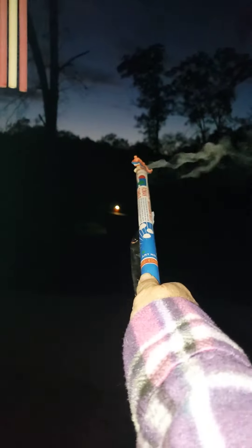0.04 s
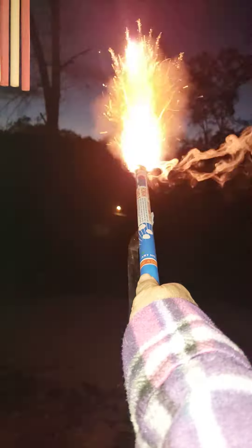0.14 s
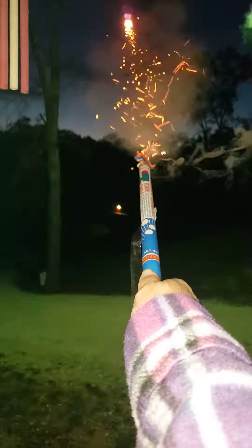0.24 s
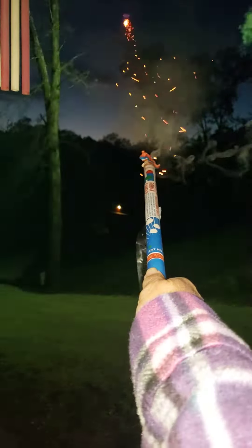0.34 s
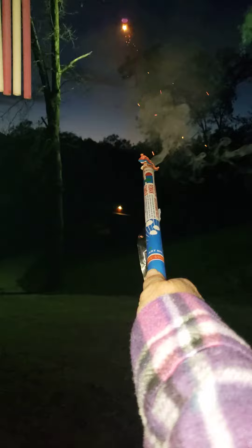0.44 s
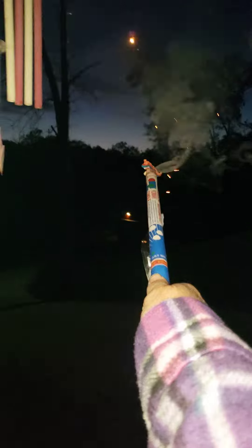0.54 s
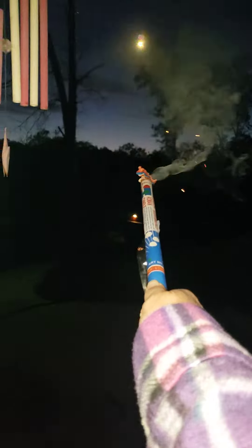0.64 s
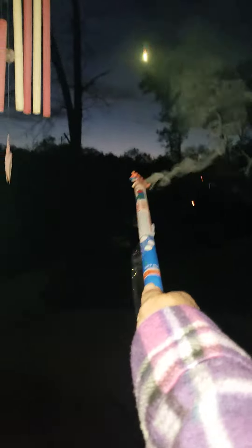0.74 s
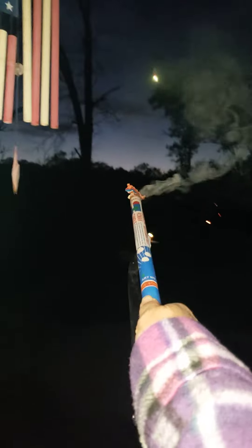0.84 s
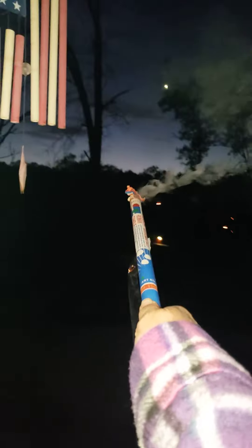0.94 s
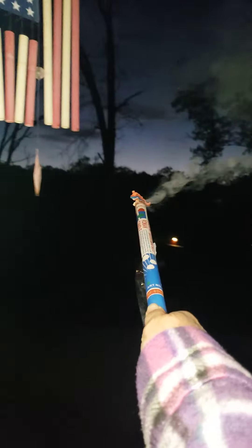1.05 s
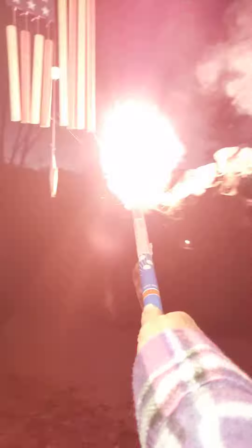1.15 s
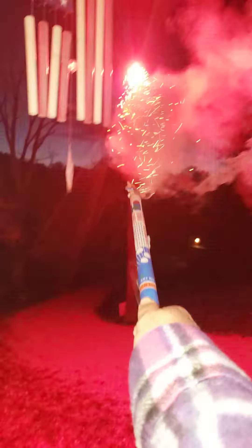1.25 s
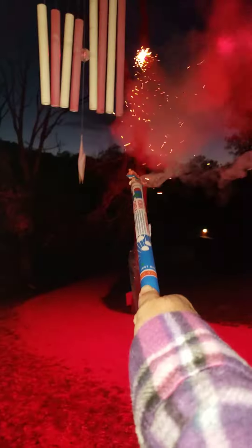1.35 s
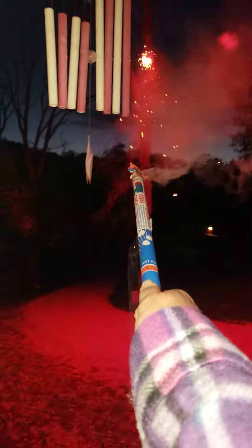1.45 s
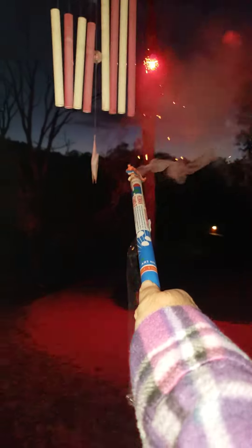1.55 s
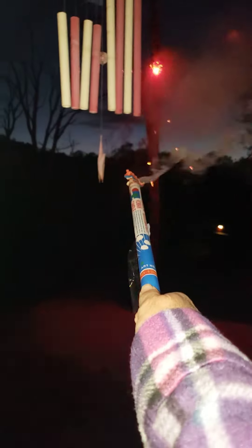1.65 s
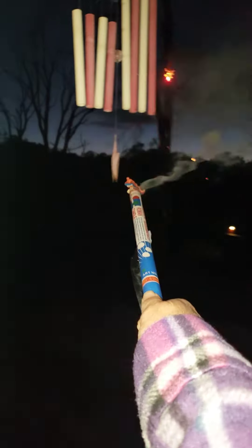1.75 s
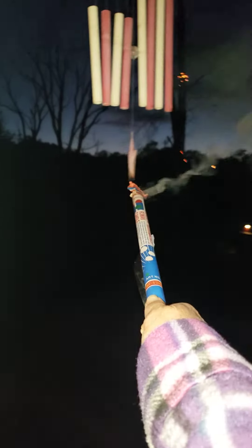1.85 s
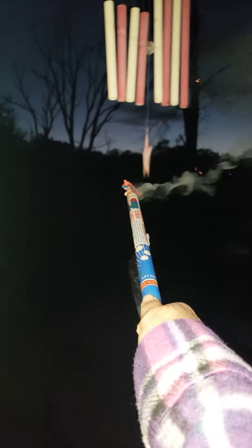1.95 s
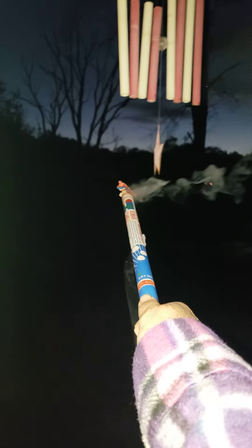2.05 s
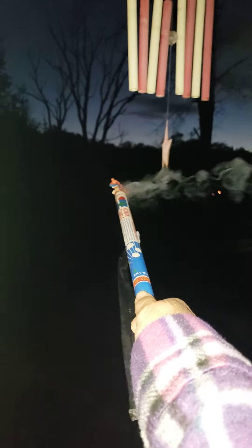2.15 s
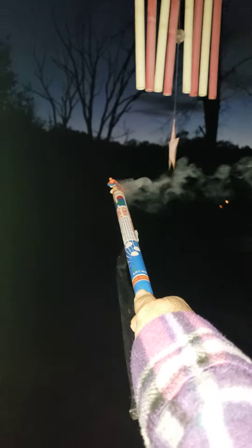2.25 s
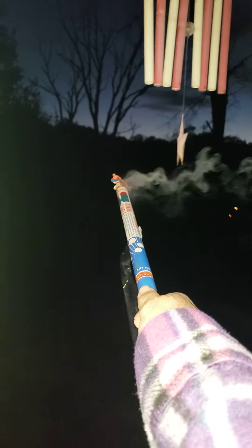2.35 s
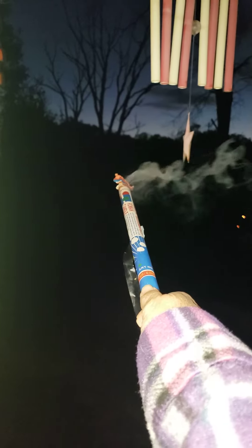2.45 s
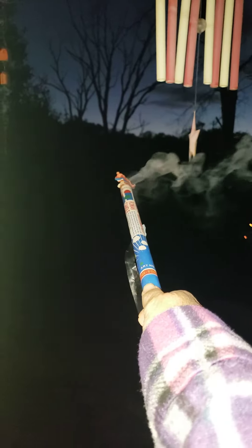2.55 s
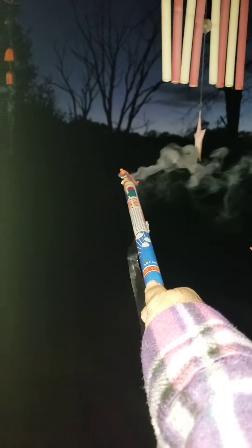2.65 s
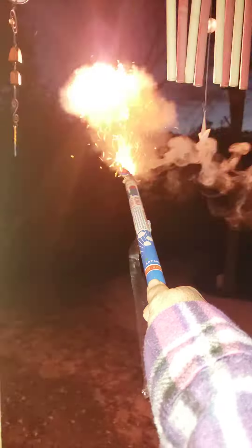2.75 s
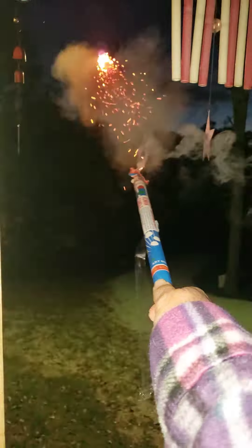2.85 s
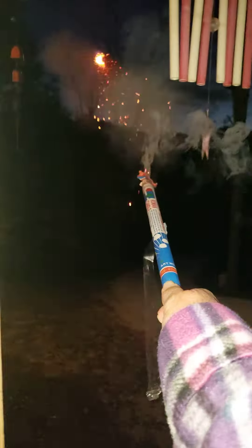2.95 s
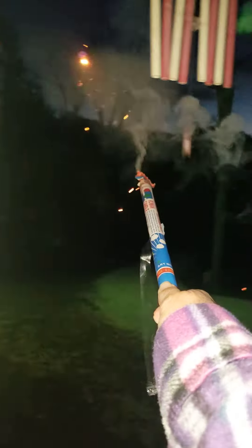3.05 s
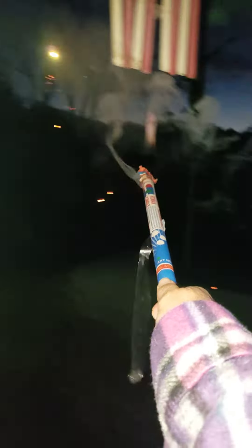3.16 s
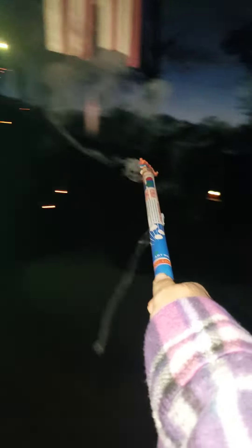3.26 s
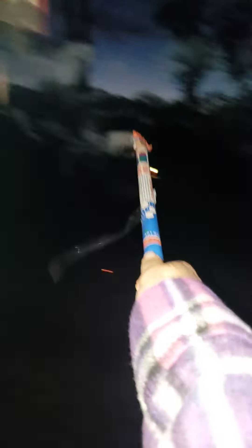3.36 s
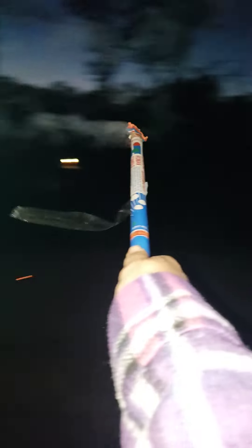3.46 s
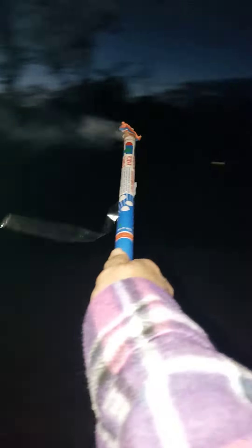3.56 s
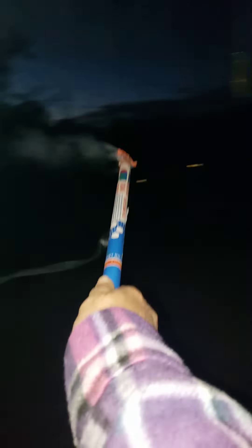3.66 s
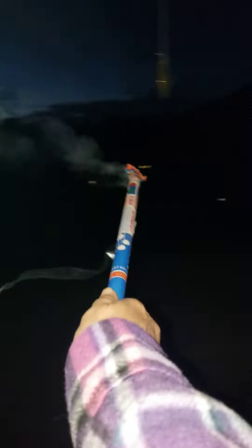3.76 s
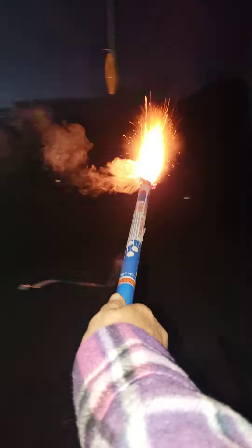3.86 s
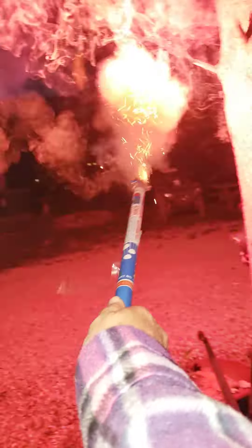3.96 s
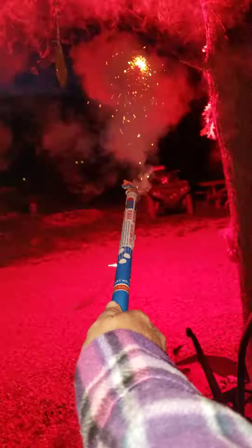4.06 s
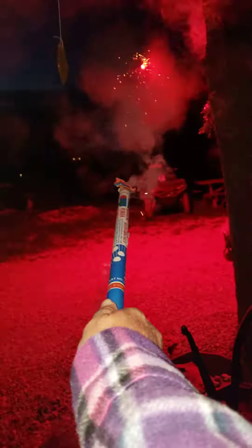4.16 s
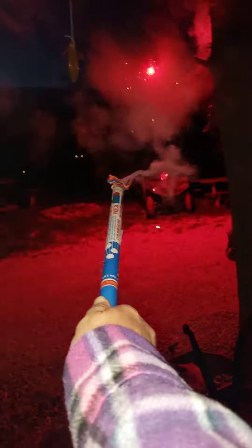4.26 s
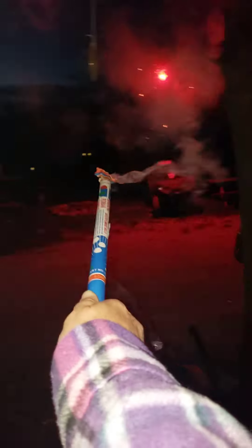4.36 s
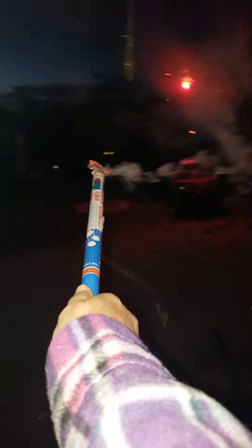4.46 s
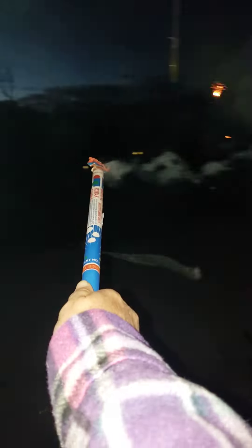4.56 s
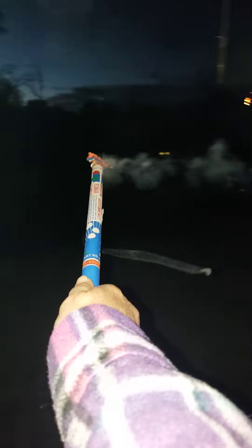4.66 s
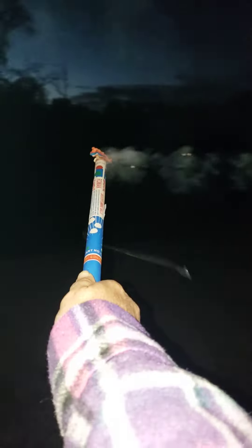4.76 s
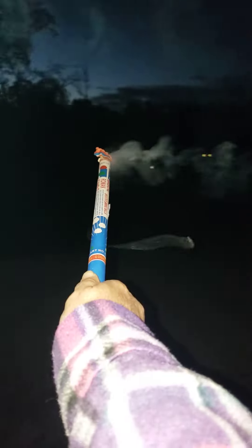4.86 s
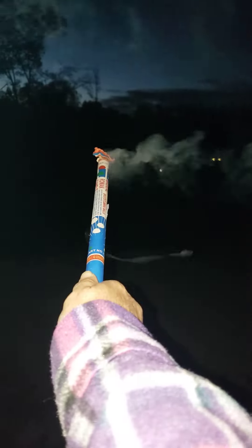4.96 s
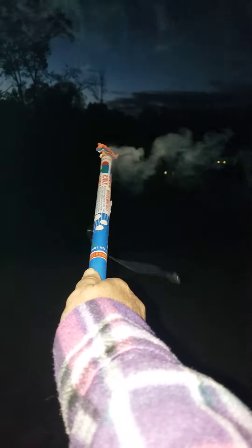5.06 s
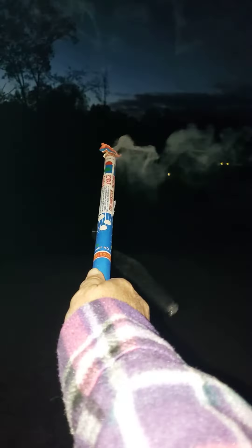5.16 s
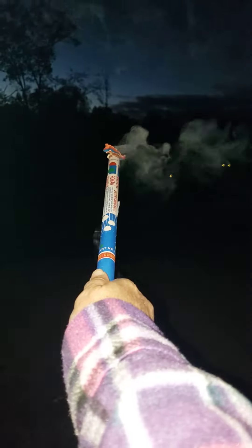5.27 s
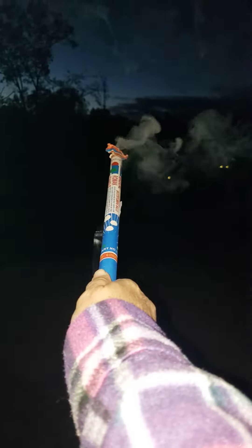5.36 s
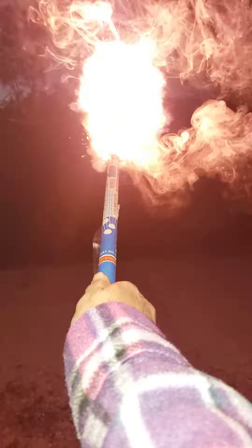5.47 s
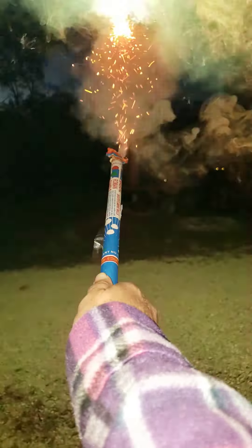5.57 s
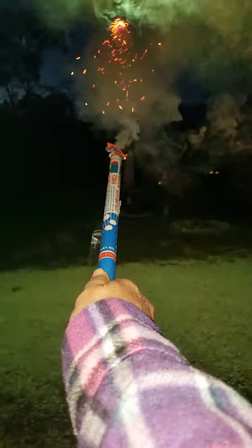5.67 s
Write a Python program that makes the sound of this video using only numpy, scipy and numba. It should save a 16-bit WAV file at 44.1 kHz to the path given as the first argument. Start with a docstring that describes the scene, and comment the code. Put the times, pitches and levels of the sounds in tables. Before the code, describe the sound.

A handheld firework tube burns close to the microphone, outdoors beside a porch on a quiet night. Its fuse fizzes softly with a slightly hollow tone. Five times, a little over a second apart, it shoots a fireball with a sharp pop and a short crackling rush of gas, each followed by a brief echo. The hiss continues between the shots, with a few tiny spark snaps.

```python
"""Beside a porch at dusk, a hand-held firework tube burns. Fuse powder hisses deep in the cardboard tube,
a pipe closed at one end, whose odd modes fall in pitch as the burn lengthens the air column. Five times
a lift charge blows a star out in a crackling rush of turbulent gas, with shock fronts and a low push
of air. Porch, ground and trees reflect the shots. Sparks snap, and a far thud and a faint tone sound
over the quiet night. Two microphones a few centimetres apart listen."""
import sys
import numpy as np
from scipy import signal
from scipy.fft import rfft, irfft
from scipy.io import wavfile
from numba import njit

SR = 44100
rng = np.random.default_rng(int(sys.argv[2]) if len(sys.argv) > 2 else 0)


def int16_out(signal):
    """Quantize to a 16-bit WAV file."""
    q = np.round(np.clip(np.atleast_2d(signal).T, -1, 1) * 32767)
    wavfile.write(sys.argv[1], SR, q.astype(np.int16))


N = 252711
T = np.arange(N) / SR
HZ = np.maximum(np.fft.rfftfreq(N, 1 / SR), 1)


def amp(db):
    """Amplitude ratio of a level in decibels."""
    return 10 ** (np.asarray(db) / 20)


def unit(x):
    """Normalisation to rms 1."""
    return x / np.sqrt(np.mean(x ** 2) + 1e-20)


def at_hz(points, hz=HZ):
    """Interpolation of a table on a log-frequency axis."""
    return np.interp(np.log(hz), np.log(np.array(points)[:, 0]), np.array(points)[:, 1])


def coloured(x, spectrum):
    """Spectral shaping of x, to rms 1."""
    return unit(irfft(rfft(x) * amp(at_hz(spectrum)), N))


def butter(x, hz, kind, order=2):
    """Butterworth filter."""
    return signal.sosfilt(signal.butter(order, hz, kind, fs=SR, output="sos"), x)


def drift(hz):
    """Random modulation: low-pass noise of rms 1."""
    return unit(irfft(rfft(rng.standard_normal(N)) / (1 + (HZ / hz) ** 2), N))


def bump(middle_s, half_s, level_db):
    """A Gaussian envelope in time."""
    return amp(level_db) * np.exp(-((T - middle_s) / half_s) ** 2)


def crackle(per_s, spread_db, noise):
    """Shot noise: two independent rows of uneven impulses over white noise."""
    sizes = amp(spread_db * np.minimum(rng.exponential(1, (2, N)), 5)) * rng.choice([-1, 1], (2, N))
    clicks = unit(sizes * (rng.random((2, N)) < per_s / SR))
    return clicks + noise * rng.standard_normal((2, N))


@njit
def resonate(x, hz, width_hz):
    """A two-pole resonator of moving centre and bandwidth, with peak gain 1."""
    out = np.zeros_like(x)
    for i in range(2, x.shape[1]):
        r = np.exp(-np.pi * width_hz[i] / SR)
        pull = 2 * r * np.cos(2 * np.pi * hz[i] / SR)
        for c in range(x.shape[0]):
            drive = (1 - r * r) / 2 * (x[c, i] - x[c, i - 2])
            out[c, i] = drive + pull * out[c, i - 1] - r * r * out[c, i - 2]
    return out


def night_air():
    """Ambient noise: steady, and strongest at low frequencies."""
    # spectrum of the night: frequency_hz, density_db
    spectrum = [(20, -35.5), (50, -11.5), (250, -3), (450, -7), (900, -13.5), (2500, -5), (7500, -22),
                (16000, -15)]
    return amp(-66) * coloured(rng.standard_normal((2, N)), spectrum) * [[1], [1.5]]


def faint_tone(pitch_hz=435):
    """Amplitude modulation: a pure tone comes and goes."""
    # swells of the tone: middle_s, half_length_s, peak_db
    swells = [(1.92, 0.054, -68.5), (2.4, .12, -70.5)]
    return sum(bump(*swell) for swell in swells) * np.sin(2 * np.pi * pitch_hz * T)


def far_thud(start_s=2.3625, pitch_hz=190, level_db=-38, t60_s=.03):
    """A damped low oscillation, heard as a dull far-off thud."""
    age = np.maximum(T - start_s, 0)
    return amp(level_db - 60 * age / t60_s) * np.sin(2 * np.pi * pitch_hz * age)


def sparks():
    """Impulsive sources: each spark snaps as one low-passed click."""
    # spark impulses: start_s, impulse_db
    snaps = [(1.621, -37.5), (2.169, -49), (3.525, -27)]
    clicks = np.zeros(N)
    for start_s, impulse_db in snaps:
        clicks[int(start_s * SR)] = amp(impulse_db)
    return butter(clicks, 5000, "low")


def echoes(x):
    """Reverberation: reflections from porch and ground decay band by band; trees add a long dull tail."""
    # decay of the near reflections: frequency_hz, t60_s
    decay = [(50, 0.61), (200, 0.32), (900, 0.29), (2500, 0.25), (6000, 0.23), (15000, 0.18)]
    t, edges_hz = T[:SR], 28 * 2 ** np.arange(0, 9.1, .5)
    white, near = rng.standard_normal((2, 2, SR)), 0
    for k, (low, high) in enumerate(zip(edges_hz, np.sqrt(2) * edges_hz)):
        t60_s = at_hz(decay, np.sqrt(low * high))
        near += butter(white[k % 2], [low, high], "band") * amp(-60 * t / t60_s)
    trees = butter(rng.standard_normal((2, SR)), 500, "low", order=1)
    trees *= amp(-27 - 60 * t / 2.15)   # 60 dB down in 2.15 s
    response = (near + trees) * np.clip(t / 0.024, 0, 1) / 20
    return signal.fftconvolve(x[None], response, axes=1)[:, :N] * [[1], [1.6]]


def in_tube(x, patchy_db, widen):
    """Quarter-wave resonance: the odd modes fall and sharpen as the air column lengthens."""
    # modes of the tube: ratio_to_second_mode, relative_width, level_db
    modes = [(.31, .10, -4), (1.0, .13, 0), (1.7, .16, -8), (2.34, .2, -12)]
    second_mode_hz = 2682 / (1 + 0.082 * T)   # the column gains 8.2 % of its first length each second
    waver = 1 + .02 * drift(6)   # hot gas makes the pitch waver
    out = 0
    for k, (ratio, width, level_db) in enumerate(modes):
        hz = ratio * second_mode_hz * waver
        width_hz = widen * width * second_mode_hz * (second_mode_hz / 2000) ** 1.5
        mode = resonate(resonate(x, hz, width_hz), hz, width_hz) / np.sqrt(width_hz)
        out += (-1) ** k * amp(level_db + patchy_db * drift(5.5)) * unit(mode)
    return out


def whistles(fizz):
    """Narrow-band resonance: for moments the hiss takes on a pitch."""
    # brief whistles: middle_s, half_length_s, pitch_hz, width_hz, peak_db
    moments = [(4.162, 0.17, 3670, 250, -61), (4.71, 0.18, 2990, 510, -55.5), (5.0, 0.41, 4430, 400, -71.5)]
    out = 0
    for middle_s, half_s, pitch_hz, width_hz, peak_db in moments:
        hz, width_hz = np.full(N, float(pitch_hz)), np.full(N, float(width_hz))
        band = resonate(resonate(fizz, hz, width_hz), hz, width_hz)
        out += unit(band) * bump(middle_s, half_s, peak_db)
    return out


def fuse(stall_s=2.312, fade_s=0.039, relight_s=2.454):
    """Combustion noise: fizzing powder hisses and excites the tube. Beneath it a low rumble swells."""
    # course of the burn: time_s, tube_db, hiss_db
    levels = [(0, -65.5, -77), (.12, -61.5, -59), (.6, -68, -63.5), (.95, -65, -68), (1.1, -69, -79),
              (1.4, -65, -62.5), (1.65, -63, -61), (2.28, -68.5, -63), (2.58, -62, -62.5),
              (3.15, -59.5, -57), (3.55, -62.5, -58.5), (3.82, -62, -60), (4.15, -57, -57),
              (4.4, -60.5, -60.5), (4.62, -59, -57), (4.9, -64.5, -58), (5.4, -66, -60.5), (5.69, -61, -56)]
    # spectrum of the open hiss: frequency_hz, density_db
    hiss_spectrum = [(500, -12.5), (1100, -3), (3000, 3.5), (5500, -0.5), (8300, -7), (11500, -5.5),
                     (16000, -14.5)]
    # brief swells of low rumble: middle_s, half_length_s, rumble_db
    swells = [(0.058, 0.15, -69.5), (0.685, 0.039, -68), (1.633, 0.036, -76), (2.55, 0.051, -69),
              (3.525, 0.13, -63.5), (4.56, 0.19, -67.5), (4.85, 0.085, -75)]
    times_s, *columns = np.transpose(levels)
    tube_db, hiss_db = [np.interp(T, times_s, column) for column in columns]
    tube = in_tube(crackle(per_s=6000, spread_db=2.5, noise=.8), patchy_db=1.1, widen=1.3) * amp(tube_db)
    fizz = crackle(per_s=8000, spread_db=3.2, noise=0.86)
    steady = amp(-75)
    rumble_gain = steady + sum(bump(*swell) for swell in swells)
    hiss = coloured(fizz, hiss_spectrum) * amp(hiss_db + 0.61 * drift(14))
    hiss *= (rumble_gain / steady) ** 0.2   # the hiss lifts slightly with each swell
    rumble = unit(butter(rng.standard_normal((2, N)), [130, 450], "band"))
    rumble *= rumble_gain * amp(1.5 * drift(12))
    # the burn falters, dies away and catches again at once
    alight = np.where(T < relight_s, np.exp(-np.maximum(T - stall_s, 0) / fade_s), 1)
    return (tube + hiss) * alight + rumble + whistles(fizz)


def shock_fronts():
    """N-waves: the pressure jumps up, slides below ambient and returns more softly."""
    # shocks inside the blasts: start_s, peak_db, length_ms
    shocks = [(.1775, -4, .9), (1.1879, -5, 1.8), (2.7310, -7, .6), (2.7428, -3, 1.6), (3.9019, -6, .7),
              (3.9228, -7, 1.6), (5.4564, -4, .6), (5.4725, -6, 1.9), (5.4771, -6, 1.4), (5.4814, -4, 1.9)]
    out = np.zeros(N)
    for start_s, peak_db, length_ms in shocks:
        phase = np.linspace(0, 1, int(length_ms * SR / 1000))
        n_wave = np.interp(phase, [0, .05, .65, 1], [0, 1, -.85, 0])
        out[int(start_s * SR):][:len(phase)] += amp(peak_db) * n_wave
    return out


def lift_charges(darken_db_per_s=150.5, linger_db=-21.5, linger_db_per_s=350.5):
    """Jet noise: gas swells, roars and is spent. Returns the direct sound and the part to be reflected."""
    # one row a charge: start_s, swell_s, hold_s, level_db, fall_db_per_s, treble_db,
    # push_db, push_hz, push_t60_s, ring_db, echo_db
    charges = [(.165, .015, 0.013, -19.5, 602, 7, -13, 68.2, 0.098, -11, -10),
               (1.159, 0.028, 0.0033, -18.5, 599, 0.5, -26.5, 179, .026, -10.5, -18.5),
               (2.717, 0.023, .014, -17.5, 800, 3.5, -17.5, 45.4, 0.096, -10.5, -12.5),
               (3.893, 0.012, 0.021, -14, 650, 2, -18.5, 67.6, .065, -17, -16.5),
               (5.448, .013, 0.025, -16, 1096, 5.5, -20, 65.4, .12, -10, -17)]
    # spectrum of the rushing gas: frequency_hz, density_db
    gas_spectrum = [(60, -16.5), (180, -4), (650, -8.5), (1200, -9), (2200, -8), (4000, -13), (6500, -23.5),
                    (8200, -28.5), (11000, -25), (16000, -26)]
    gas = coloured(crackle(per_s=3000, spread_db=3.7, noise=0.66), gas_spectrum)
    gusts = amp(2.6 * drift(92))
    ring = in_tube(rng.standard_normal((2, N)), patchy_db=0, widen=2.5)   # the flow damps the modes
    treble, fronts = butter(gas, 5000, "high"), shock_fronts()
    direct, sent = np.zeros((2, N)), np.zeros(N)
    for (start_s, swell_s, hold_s, level_db, fall_db_per_s, treble_db,
         push_db, push_hz, push_t60_s, ring_db, echo_db) in charges:
        since_full = np.maximum(T - start_s - swell_s, 0)
        spent_s = np.maximum(since_full - hold_s, 0)
        rise = np.clip((T - start_s) / swell_s, 0, 1) ** 0.84
        trickle = amp(linger_db - linger_db_per_s * spent_s)   # the last gas leaves more slowly
        flow = rise * np.maximum(amp(-fall_db_per_s * spent_s), trickle)
        brightness = amp(treble_db - darken_db_per_s * spent_s)   # slowing gas loses its treble
        roar = gas + amp(ring_db) * ring + (brightness - 1) * treble
        shot = amp(level_db) * flow * gusts * roar
        shot[0] += fronts * (abs(T - start_s) < .1)   # this charge's own shocks
        # at full flow the air is pushed aside in a damped low swing
        push = amp(push_db - 60 * since_full / push_t60_s) * np.sin(2 * np.pi * push_hz * since_full)
        direct += shot + push * [[1], [0]]
        sent += amp(echo_db) * (shot[0] + 0.32 * push)
    return direct, sent


def microphones(pair, right_lag_s=0.00013):
    """Partial coherence: row 0 is common to both microphones, row 1 is the scattered part that differs."""
    # level difference between the microphones: frequency_hz, left_minus_right_db
    balance = [(30, 2), (60, -1.5), (130, -2), (290, -3.5), (640, 0.5), (1400, -5), (3100, -4), (6800, 1),
               (10000, 4), (15000, 4)]
    # weight of the scattered sound: frequency_hz, amplitude_share
    scatter = [(60, .03), (500, 0.33), (2000, 0.44), (15000, 0.71)]
    apart, tilt = np.clip(at_hz(scatter), 0, 1), amp(at_hz(balance) / 2)
    common, scattered = rfft(pair) * [np.sqrt(1 - apart ** 2), apart]
    left = (common + scattered) * tilt
    right = (common - scattered) / tilt * np.exp(-2j * np.pi * HZ * right_lag_s)
    return irfft(np.array([left, right]), N)


def scene():
    """Superposition of night, fuse, shots and echoes at the two microphones."""
    shots, sent = lift_charges()
    small_sounds = (faint_tone() + far_thud() + sparks()) * [[1], [0]]
    return microphones(night_air() + small_sounds + fuse() + echoes(sent) + shots)


def record(dry):
    """Band limiting and soft saturation: deep bass is lost, peaks are rounded, the top is cut."""
    soft = 1.327 * np.tanh(butter(dry, 36, "high") / 1.064)
    return signal.sosfilt(signal.ellip(12, .5, 70, 15950, fs=SR, output="sos"), soft)


dry = scene()
out = record(dry)
int16_out(out)
```